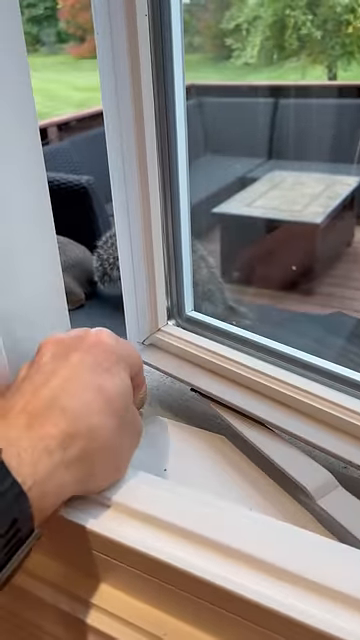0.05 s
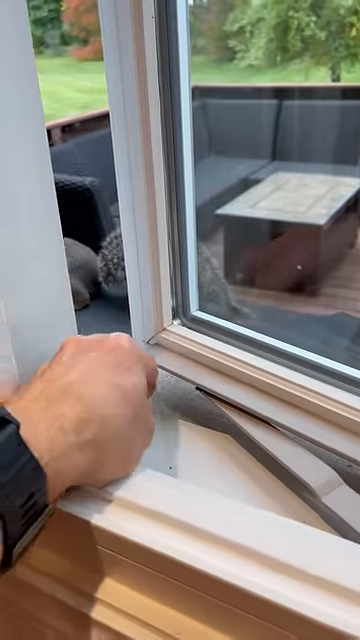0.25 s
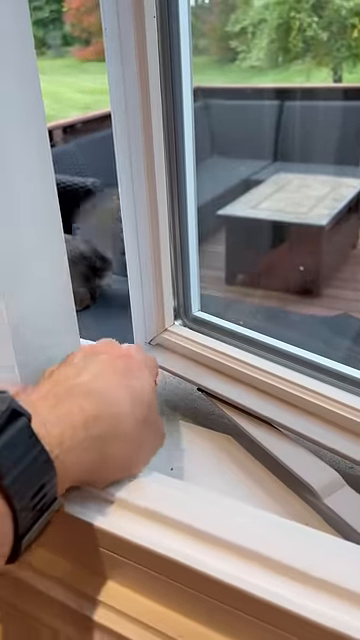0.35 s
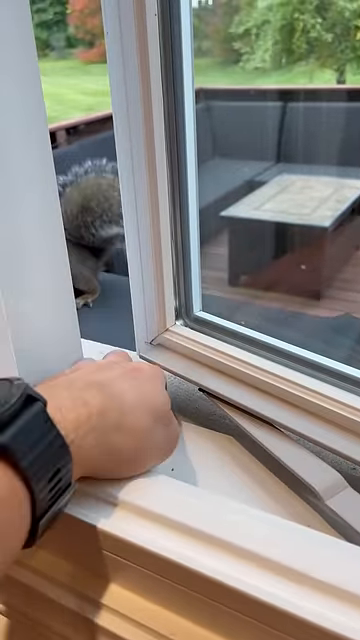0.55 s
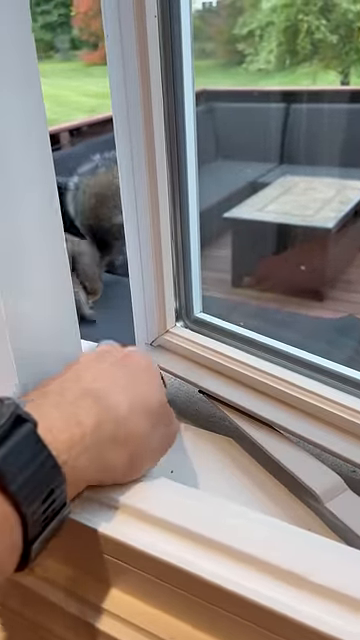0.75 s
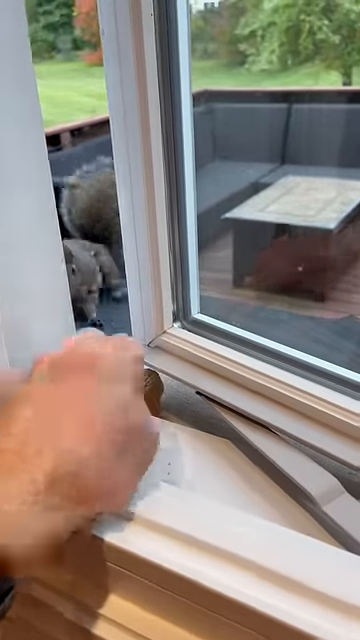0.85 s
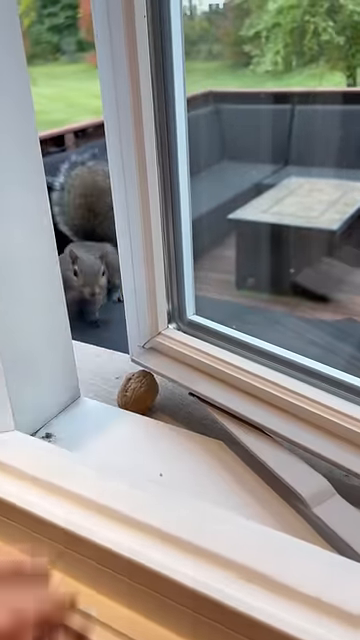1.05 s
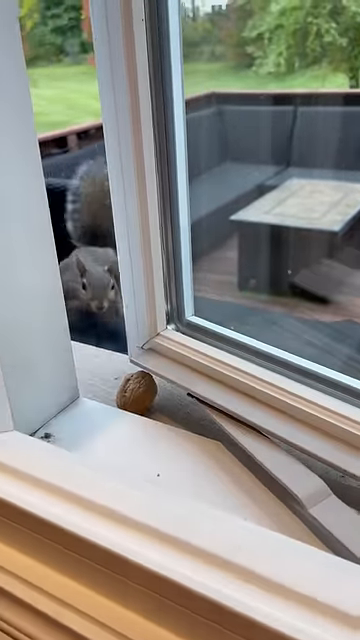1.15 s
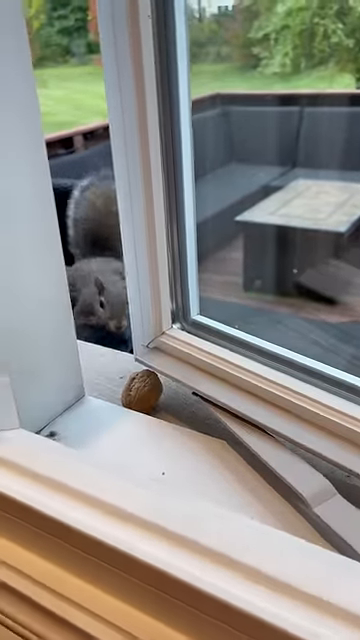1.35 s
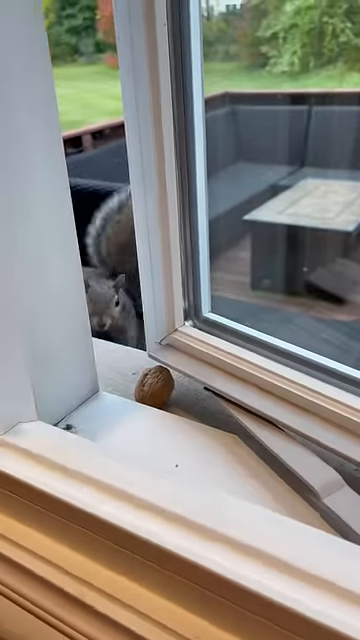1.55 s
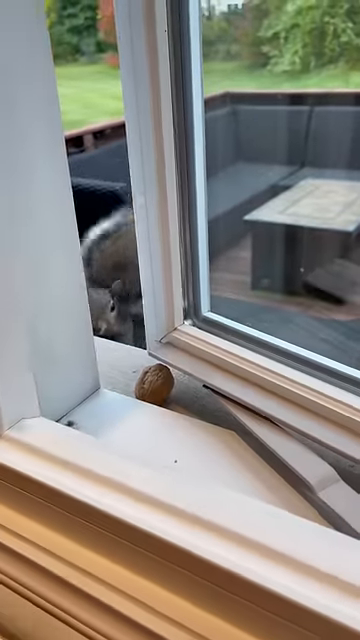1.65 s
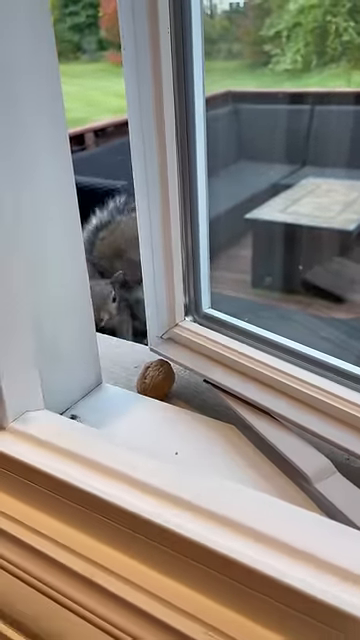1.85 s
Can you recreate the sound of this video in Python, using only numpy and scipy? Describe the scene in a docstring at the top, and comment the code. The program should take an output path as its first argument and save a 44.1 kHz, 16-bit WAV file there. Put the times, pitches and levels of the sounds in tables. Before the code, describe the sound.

A nutshell bumps, scrapes and knocks sharply on a window sill, heard from one side in a quiet room. A soft slide of the hand, small rustles and a faint rattle follow, with low thumps of someone moving underneath.

```python
"""A nut is rolled by hand along a window sill: the ridges of its shell bump, stick and slip, and catch,
then it taps down and rocks to rest, each contact ringing the sill and frame.
The hand slides off with a soft friction swish, followed by small rustles and a faint loose rattle.
Dull thumps of someone moving lie under it all, in a quiet room.
Two closely spaced microphone ports hear it from one side."""
import sys
import numpy as np
from scipy import signal
from scipy.fft import rfft, irfft, next_fast_len
from scipy.io import wavfile
from scipy.ndimage import map_coordinates

SR = 44100
rng = np.random.default_rng(int(sys.argv[2]) if len(sys.argv) > 2 else 0)


def digitize_waveform(pressure):
    """Quantize a signal to 16-bit integers and store it at the path in sys.argv[1].

    Rows of a 2-D input are taken as channels; values are limited to [-1, 1].
    """
    field = np.atleast_2d(pressure).T
    bounded = np.clip(field, -1, 1)
    quanta = np.round(bounded * 32767).astype(np.int16)
    wavfile.write(sys.argv[1], SR, quanta)


N = 83790

# crisp colour of the rustles and the rattle's chatter (frequency [Hz], level [dB])
RUSTLE_TONE = [(100, -5), (1200, -0.5), (2500, -9.5), (4500, -7), (6500, 3), (8000, 4.5), (9300, -13),
               (10700, 5), (12000, -18.5), (15000, -39)]


def rolling():
    """Ridges of the shell bump and tick over the sill, grinding a little, while the fingers rub."""
    # soft bumps (time [s], level [dB])
    bumps = [(.0215, -34), (.028, -30), (.032, -34.5), (.057, -32.5), (.077, -34), (.0795, -31),
             (.1245, -42.5), (.1305, -29), (.1335, -23), (.146, -37), (0.1782, -28.5), (0.183, -26)]
    # their woody colour (frequency [Hz], level [dB])
    bump_tone = [(40, -24.5), (150, -9), (330, -2.5), (520, -10.5), (670, -2.5), (800, -6.5), (1250, 0),
                 (1450, -5.5), (1600, 2.5), (1850, -9), (2100, 1), (2450, -7), (2650, 2.5), (3050, -19.5),
                 (4200, -27.5), (5200, -28), (7500, -25), (11000, -23.5), (12500, -47)]
    # crisp ticks as the shell rolls and lands (time [s], level [dB])
    ticks = [(.0195, -42.5), (.057, -55), (.076, -52), (.1235, -50), (.1302, -42.5), (.1775, -51),
             (.4805, -32.5), (.575, -42.5), (.6285, -55)]
    # light finger rubs (start [s], rise [s], hold [s], fade [s], level [dB])
    rubs = [(0.015, 0.0036, 0.22, .03, -62.5), (0.476, 0.0093, 0.13, .05, -61)]
    # bright colour of ticks and rubs (frequency [Hz], level [dB])
    tick_tone = [(200, -13), (2500, -3.5), (4200, 0.5), (5200, -6), (7500, -0.5), (11000, 1), (12300, -18),
                 (15000, -40)]
    grind_db, grind_width_s, tick_t60 = -25.5, .0034, .025
    t = since(0)
    grind = sum(amp(db + grind_db) * np.exp(-np.abs(t - s) / grind_width_s) for s, db in bumps)
    tick = sum((t > s) * amp(db - 60 * since(s) / tick_t60) for s, db in ticks) / 2
    rub = sum(stroke(*row) for row in rubs)
    force = blows(bumps) + grind * rng.standard_normal(N)
    return through(force, click(bump_tone)) + (rub + tick) * noise(tick_tone)


def scraping():
    """The pushed shell sticks and slips unevenly: a rasp over a hollow body, with a few hard catches."""
    # scrapes (start [s], rise [s], hold [s], fade [s], rasp level [dB], body level [dB])
    scrapes = [(0.238, 0.0077, 0.011, 0.013, -24.5, -29), (.294, 0.0057, 0.006, 0.01, -28.5, -42),
               (0.311, 0.0073, 0.0079, 0.018, -26, -36), (0.408, 0.027, 0.02, 0.04, -28.5, -55.5),
               (0.479, 0.0041, .012, 0.0072, -42, -62.5)]
    # colour of the rasp (frequency [Hz], level [dB])
    rasp_tone = [(40, -30.5), (200, -26), (500, -26.5), (900, -33.5), (1250, -13), (1700, -10),
                 (2050, -1.5), (2650, -2.5), (3100, -8), (3700, -19.5), (4300, -15), (5000, -20),
                 (6000, -24.5), (8000, -29.5), (11000, -25), (12500, -48), (15000, -55.5)]
    # colour of the hollow body (frequency [Hz], level [dB])
    body_tone = [(40, -26.5), (300, -16.5), (520, -16), (670, -6.5), (820, -5.5), (1080, 1.5), (1230, 7.5),
                 (1420, 0.5), (1800, -2.5), (3000, -16.5), (8000, -49)]
    # hard catches (time [s], level [dB])
    catches = [(.2462, -15.5), (.249, -16), (.2532, -15.5), (.2566, -8.5), (.3005, -19), (.304, -28),
               (.3233, -18.5), (.327, -13), (.4478, -23), (.4512, -23), (.4563, -26)]
    # their sharp colour (frequency [Hz], level [dB])
    catch_tone = [(40, -43.5), (200, -29.5), (600, -20), (1200, -8), (1700, -6.5), (2100, 8.5), (2550, -2),
                  (3100, -8), (4200, -21.5), (5000, -30.5), (6000, -28.5), (8000, -38), (11000, -27),
                  (12500, -48.5), (15000, -64.5)]
    slips_per_s, slip_spread_db, grit_db = 1200, 4, -10.5
    slipping = rng.random(N) < slips_per_s / SR
    strength = amp(slip_spread_db * rng.standard_normal(N))
    grit = rng.standard_normal(N)
    friction = unit(unit(slipping * strength * np.sign(grit)) + amp(grit_db) * grit)
    out = through(blows(catches), click(catch_tone))
    rasp, body = click(rasp_tone), click(body_tone)
    for *shape, rasp_db, body_db in scrapes:
        shell = amp(rasp_db) * rasp / np.linalg.norm(rasp) + amp(body_db) * body / np.linalg.norm(body)
        out += through(stroke(*shape, db=0) * friction, shell)
    return out


def tapping():
    """The nut settles, each tap a dry click and a low knock; light taps are duller."""
    # taps (time [s], click level [dB], knock level [dB], low-pass cutoff [Hz])
    taps = [(0.4798, -12.5, -26, 12600), (0.5433, -28, -45, 4200), (0.5749, -26.5, -42, 6830),
            (0.6286, -32.5, -47.5, 5940)]
    # colour of the click (frequency [Hz], level [dB])
    tap_tone = [(40, -30), (400, -15), (1000, -12), (1400, -3), (2000, 0), (2700, -7), (4000, -8),
                (5000, -26), (6300, -26), (7400, -17), (8800, -20), (9800, -15), (11000, -17), (12000, -32),
                (15000, -48)]
    # colour of the knock (frequency [Hz], level [dB])
    knock_tone = [(40, -1), (150, -5), (350, -1.5), (620, 6), (1000, -13.5), (2000, -65), (8000, -91)]
    grit_db, grit_t60 = -20, .017  # the shell chatters briefly on landing
    out = np.zeros(N)
    for s, db, knock_db, cutoff_hz in taps:
        t = since(s)
        grit = (t > 0) * amp(db + grit_db - 60 * t / grit_t60) * rng.standard_normal(N)
        tap = through(blows([(s, db)]) + grit, click(tap_tone))
        knock = through(blows([(s, knock_db)]), click(knock_tone))
        out += signal.lfilter(*signal.butter(2, cutoff_hz, fs=SR), tap + knock)
    return out


def sill(contacts):
    """Every contact sets the sill and frame ringing."""
    # modes of sill and frame (frequency [Hz], level [dB], t60 [s])
    modes = [(668, -4, .16), (1086, -1, .16), (1226, 1, .12), (1411, -1, .14), (1545, -4, .08),
             (1738, -8, .12), (1943, -4, .13), (2029, 0, .13), (2130, 0, .12), (2270, -1, .12),
             (2390, -4, .12), (2496, -4, .1), (2624, 3, .14), (2792, 0, .13), (3020, -2, .12),
             (4250, -2, .08)]
    ring_db = -54
    t = since(0)
    ring = sum(amp(db - 60 * t / t60) * np.cos(2 * np.pi * hz * t) for hz, db, t60 in modes)
    return contacts + amp(ring_db) * through(contacts, ring)


def hand():
    """The hand slides away with uneven friction, among brief rustles."""
    # swell of the slide (time [s], level [dB])
    slide = [(.765, -77), (.782, -58), (.84, -50), (.895, -49.5), (.93, -61), (.97, -90), (1.02, -110)]
    # its airy colour (frequency [Hz], level [dB])
    swish_tone = [(40, -4.5), (200, -6.5), (600, -0.5), (1000, -7), (1700, -7.5), (2300, -1.5), (2800, 0),
                  (3500, -11), (5000, -6.5), (7000, -0.5), (9000, -7.5), (10800, 5), (12000, -4),
                  (14500, -22)]
    # small rustles (peak time [s], level [dB], fade [s])
    rustles = [(.699, -61.5, 0.034), (1.012, -66, 0.028), (1.084, -59, .04), (1.106, -55, 0.022),
               (1.195, -55.5, 0.024), (1.28, -58.5, 0.034), (1.301, -57.5, 0.03), (1.467, -68, 0.046),
               (1.567, -71, 0.076), (1.615, -69.5, .04), (1.638, -68, 0.048), (1.688, -68.5, 0.03),
               (1.729, -63.5, 0.056)]
    rough_db, rough_per_s, rustle_rise_s = 1, 250, .0095
    t = since(0)
    roughness = map_coordinates(rng.standard_normal(N), [t * rough_per_s], order=1)
    swish = amp(np.interp(t, *np.transpose(slide), left=-120) + rough_db * roughness)
    rustle = sum(stroke(s - rustle_rise_s, rustle_rise_s, 0, fade, db) for s, db, fade in rustles)
    return swish * noise(swish_tone) + rustle * noise(RUSTLE_TONE)


def thumps():
    """Someone moves: soft low blows, each with a scuff and a lingering boom."""
    # thumps (time [s], level [dB], pitch [Hz], t60 [s], relative scuff level [dB])
    hits = [(.02, -58, 80, .4, -19), (.17, -52.5, 62.6, 0.29, -23), (0.272, -54, 89.2, 0.36, -23),
            (.35, -51.5, 111, 0.34, -12), (0.431, -37, 95, 0.21, -11), (.5, -49, 164.1, 0.38, -20.5),
            (0.601, -49, 86.8, 0.25, -10.5), (0.789, -47.5, 80, 0.29, -13.5),
            (0.834, -37.5, 86, 0.17, -22.5), (0.934, -50.5, 60, 0.32, -16.5), (1.297, -42.5, 98, 0.3, -14),
            (1.355, -54, 65, .15, -29), (1.47, -34.5, 84.4, 0.13, -27), (1.534, -51, 69.3, .25, -20),
            (1.691, -36.5, 95, 0.15, -11.5), (1.765, -48, 93.3, 0.24, -12.5),
            (1.827, -45, 140.6, 0.19, -16), (1.857, -42.5, 83.3, .25, -17)]
    # dull colour of the scuff (frequency [Hz], level [dB])
    scuff_tone = [(30, -17.5), (70, 7.5), (160, -4.5), (230, -4.5), (420, -10.5), (800, -24), (2000, -46),
                  (8000, -58)]
    attack_s, scuff_decay_s = .0066, .07
    boom_hz, boom_db, boom_t60 = 146.9, -16, .61
    out, scuff_noise = np.zeros(N), noise(scuff_tone)
    for s, db, hz, t60, scuff_db in hits:
        t = since(s)
        attack = 1 - np.exp(-t / attack_s)
        body = amp(-60 * t / t60) * np.sin(2 * np.pi * hz * t)
        boom = amp(boom_db - 60 * t / boom_t60) * np.sin(2 * np.pi * boom_hz * t)
        scuff = amp(scuff_db) * np.exp(-t / scuff_decay_s) * scuff_noise
        out += amp(db) * attack * (body + boom + scuff)
    return out


def rattle():
    """Something loose chatters and rings faintly in short bursts."""
    # bursts (time [s], level [dB])
    bursts = [(1.767, -63.5), (1.799, -56), (1.836, -54.5)]
    # modes of the loose object (frequency [Hz], level [dB], t60 [s])
    modes = [(630, -4, 0.23), (748, 4, 0.074), (981, -2, 0.07), (1226, -6, 0.071), (1618, 7.5, 0.031),
             (1960, -12.5, 0.13), (2118, -2.5, 0.051), (2840, -13.5, 0.043), (4230, -4, 0.019)]
    chatter_db, burst_t60 = -10.5, .112
    t = since(0)
    ring = sum(amp(db - 60 * t / t60) * np.sin(2 * np.pi * hz * t) for hz, db, t60 in modes)
    shake = sum((t > s) * amp(db - 60 * since(s) / burst_t60) for s, db in bursts)
    ringing = through(shake * rng.standard_normal(N), ring / np.linalg.norm(ring))
    return ringing + amp(chatter_db) * shake * noise(RUSTLE_TONE)


def room(x):
    """A diffuse tail, new on each call, whose length and strength vary with frequency."""
    # reverb time (frequency [Hz], t60 [s])
    decay_times = [(100, 0.57), (500, 0.48), (2000, 0.33), (6000, 0.44), (11000, 0.12)]
    # reverb strength (frequency [Hz], level [dB])
    levels = [(100, -7.5), (600, -6), (2200, -21), (4000, -13.5), (7000, -12), (11000, -8.5)]
    build_up_s = .004
    hz, t, spectrum = signal.stft(rng.standard_normal(SR // 2), SR, nperseg=256)
    t60 = along(decay_times, hz)[:, None]
    decay = amp(along(levels, hz)[:, None] - 60 * t / t60)
    equal_energy = np.sqrt(2 * np.log(1000) / (t60 * SR))
    _, tail = signal.istft(spectrum * decay * equal_energy, SR, nperseg=256)
    onset = 1 - np.exp(-np.arange(len(tail)) / SR / build_up_s)
    return through(x, tail * onset)


def air():
    """Quiet, steady room tone, as mid and side signals."""
    # low rumble in the centre (frequency [Hz], level [dB])
    mid_tone = [(20, -40.5), (40, -12), (65, 1.5), (150, -7), (220, -11.5), (600, -13.5), (1200, -21.5),
                (2500, -28), (5000, -35), (7000, -35.5), (10500, -33.5), (12500, -47.5), (15000, -67)]
    # soft hush at the sides (frequency [Hz], level [dB])
    side_tone = [(20, -24.5), (100, -7), (250, 2), (600, 5), (1200, -6), (3000, -17.5), (10000, -22.5),
                 (13000, -41)]
    return amp(db=-67) * noise(mid_tone), amp(db=-76.5) * noise(side_tone)


def ports(mid, side):
    """Two close microphone ports; the sound reaches the left one slightly first."""
    # lead of left over right (frequency [Hz], phase [rad])
    lead = [(20, 0), (1700, 0), (2100, .3), (2500, 1.1), (3200, 1.5), (3800, .5), (4400, 1), (4850, 3.1),
            (5300, 5.7), (6200, 6.5), (8850, 9.4), (12000, 12.4), (15000, 12.6)]
    # balance, left minus right (frequency [Hz], level [dB])
    balance = [(180, 0), (750, -1.5), (1200, .5), (2000, -.7), (2700, -2.5), (3400, 3), (4000, 3),
               (4750, -4), (5600, .5), (11000, 0)]
    left = lambda hz: amp(along(balance, hz) / 2) * np.exp(.5j * along(lead, hz))
    right = lambda hz: 1 / left(hz)
    return np.array([filtered(mid + side, left), filtered(mid - side, right)])


def amp(db):
    """Decibels to gain."""
    return 10 ** (np.asarray(db) / 20)


def unit(x):
    """Scale to rms 1."""
    return x / np.sqrt(np.mean(x ** 2) + 1e-20)


def along(points, hz):
    """Read (frequency [Hz], value) points on a log axis."""
    freqs, values = np.transpose(points)
    return np.interp(np.log(hz + 1), np.log(freqs + 1), values)


def filtered(x, response):
    """Shape x with a frequency response."""
    size = next_fast_len(N + SR // 2)
    return irfft(rfft(x, size) * response(np.fft.rfftfreq(size, 1 / SR)), size)[..., :N]


def noise(tone):
    """Coloured noise of rms 1."""
    return unit(filtered(rng.standard_normal(N), lambda hz: amp(along(tone, hz))))


def click(tone, size=4096):
    """A minimum-phase pulse of peak 1 with the given colour."""
    gain = amp(along(tone, np.fft.rfftfreq(size, 1 / SR)))
    cepstrum = irfft(np.log(gain))
    cepstrum[1:size // 2] *= 2
    cepstrum[size // 2 + 1:] = 0
    pulse = irfft(np.exp(rfft(cepstrum)))
    return pulse / np.abs(pulse).max()


def through(x, impulse_response):
    """Play x through an impulse response."""
    return signal.fftconvolve(x, impulse_response)[:N]


def since(s):
    """Seconds after s, zero before."""
    return np.maximum(np.arange(N) / SR - s, 0)


def blows(rows):
    """One impulse for each (time [s], level [dB])."""
    s, db = np.transpose(rows)
    return np.bincount(np.round(s * SR).astype(int), amp(db), N)[:N]


def stroke(start, rise, hold, fade, db):
    """Envelope that climbs 30 dB per rise, holds at db and falls 30 dB per fade."""
    t = np.arange(N) / SR - start - rise
    return amp(db - 30 * (np.maximum(-t / rise, 0) + np.maximum((t - hold) / fade, 0)))


def scene():
    """Nut, hand and rattle with their reverb, over thumps and room tone, in stereo."""
    width_db = -8.5
    direct = sill(rolling() + scraping() + tapping()) + hand() + rattle()
    mid = direct + room(direct) + thumps()
    side = amp(width_db) * room(direct)
    air_mid, air_side = air()
    return ports(mid + air_mid, side + air_side)


def record(dry):
    """The microphone loses deep bass and top treble; nothing passes the band limit."""
    # microphone response (frequency [Hz], level [dB])
    mic_tone = [(15, -28), (35, -6.5), (55, 0), (11300, 1), (12300, -2), (15000, -8)]
    band_limit_hz = 15100
    return filtered(dry, lambda hz: amp(along(mic_tone, hz)) * (hz < band_limit_hz))


dry = scene()
out = record(dry)
digitize_waveform(out)
```